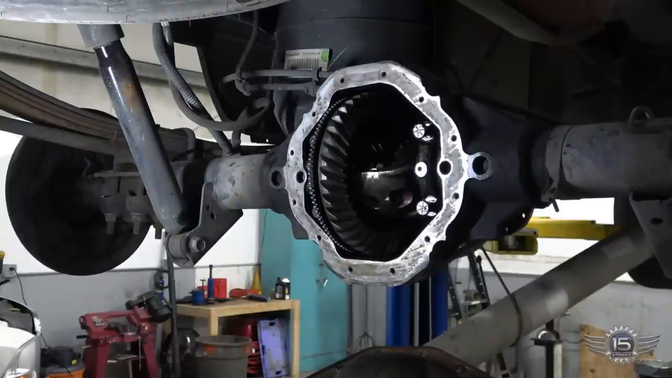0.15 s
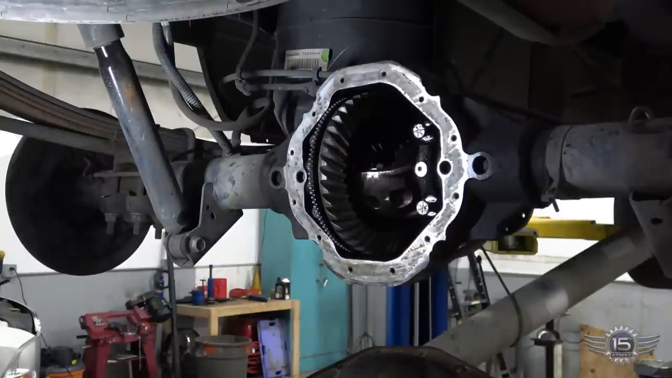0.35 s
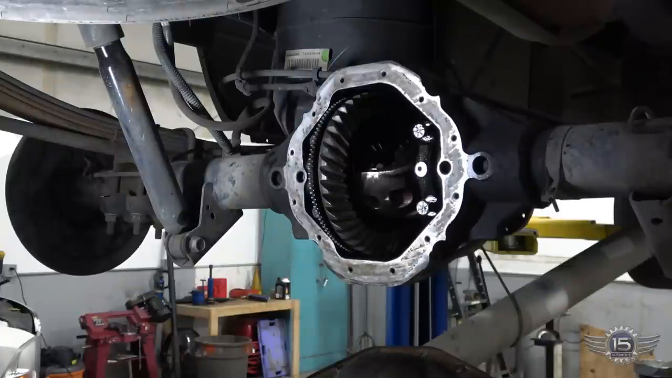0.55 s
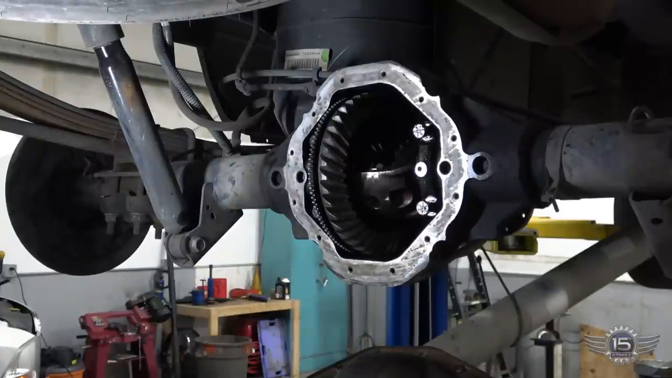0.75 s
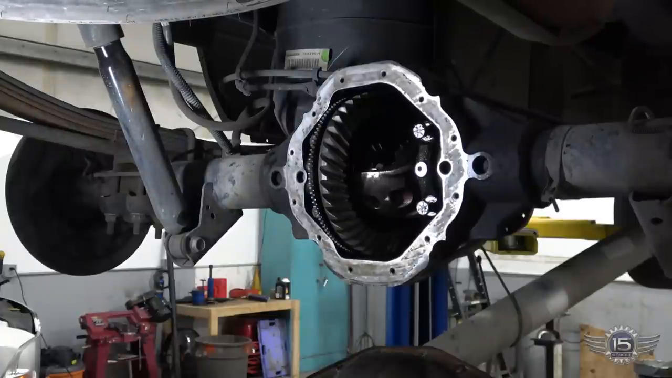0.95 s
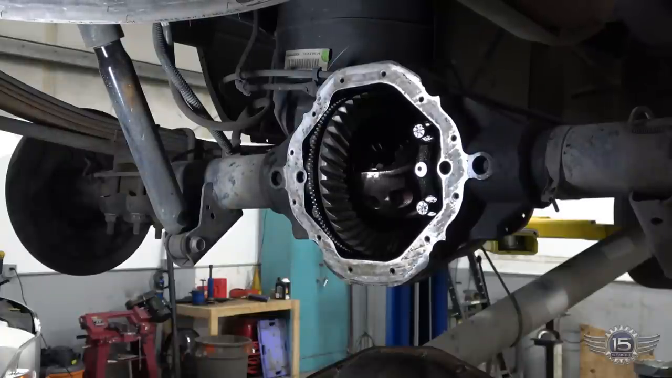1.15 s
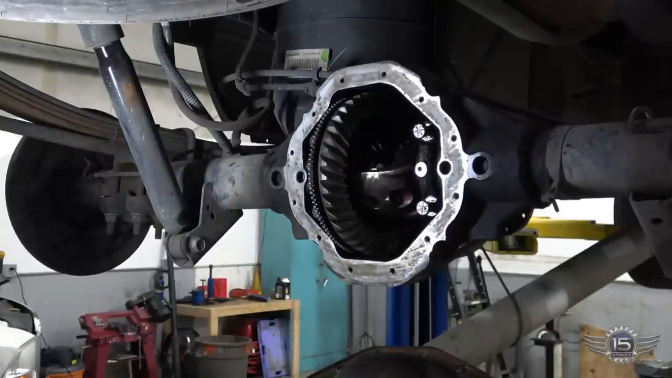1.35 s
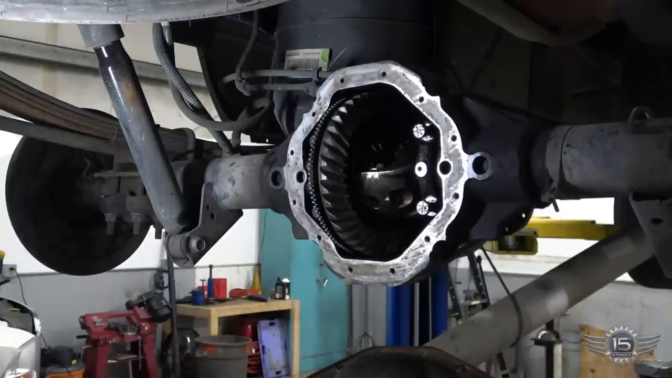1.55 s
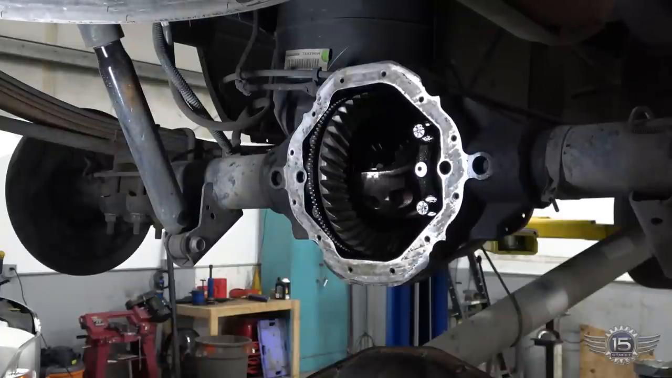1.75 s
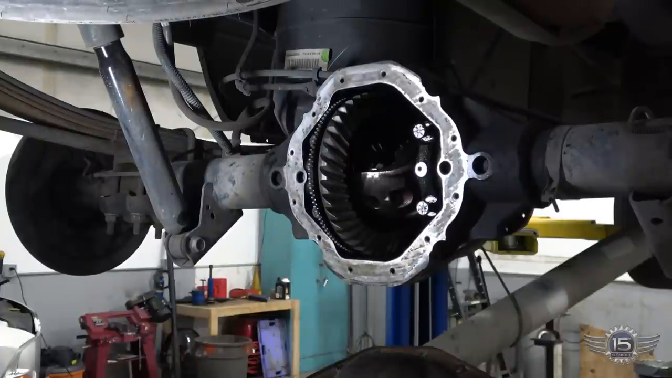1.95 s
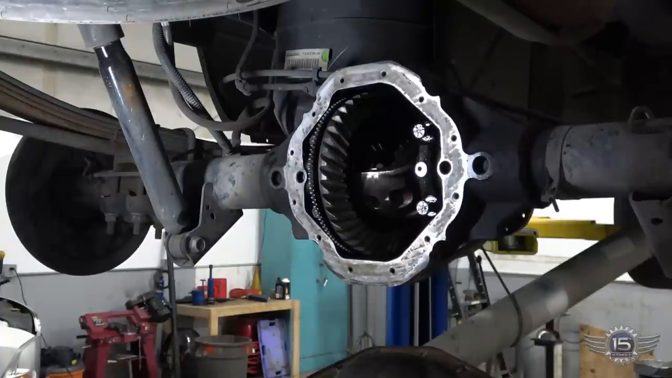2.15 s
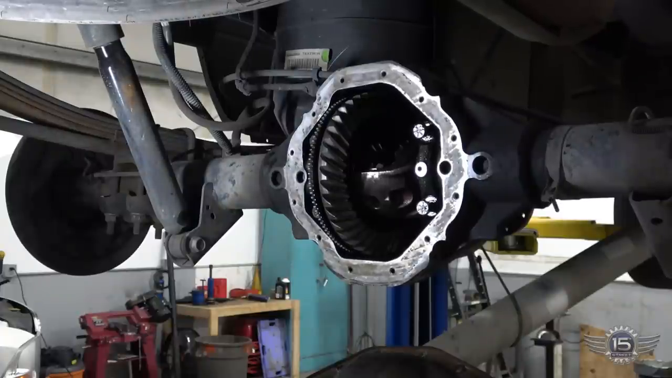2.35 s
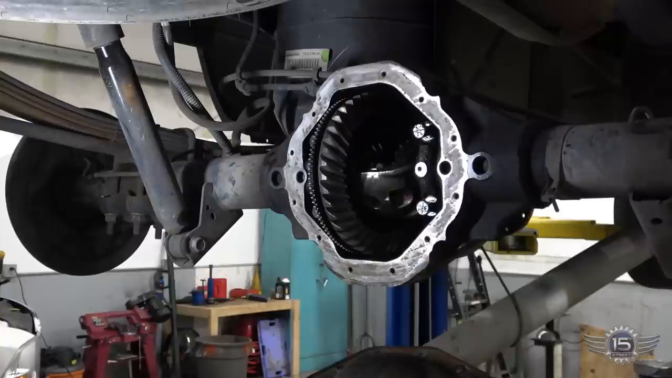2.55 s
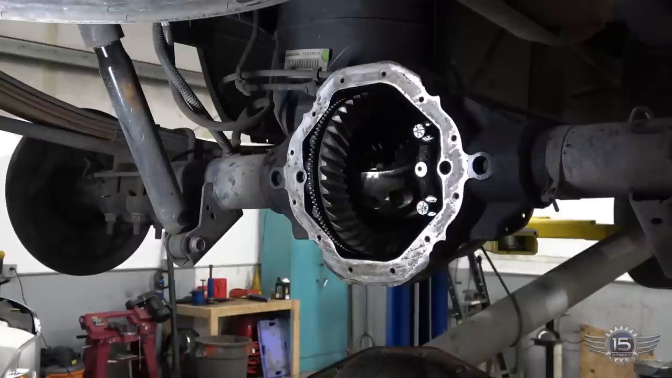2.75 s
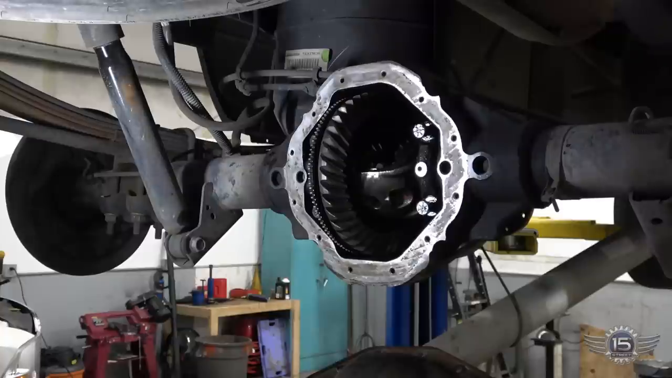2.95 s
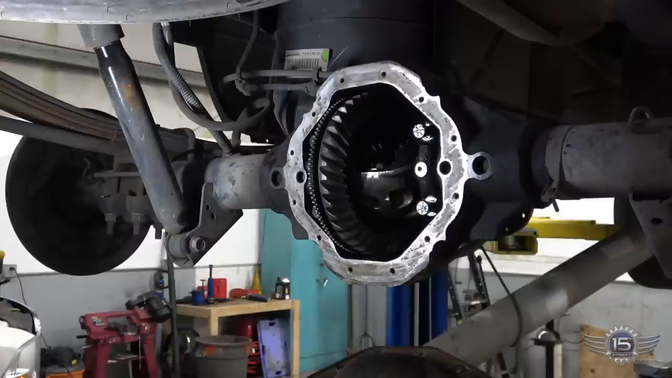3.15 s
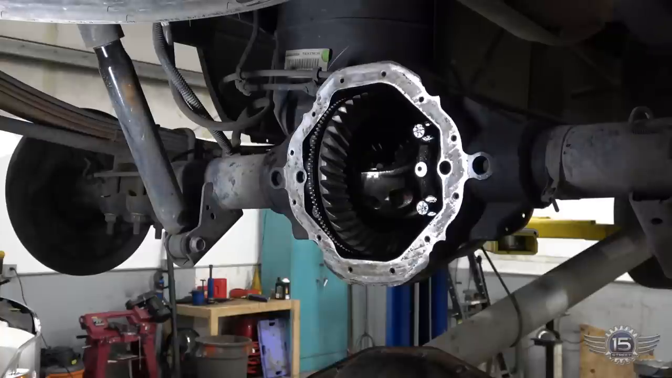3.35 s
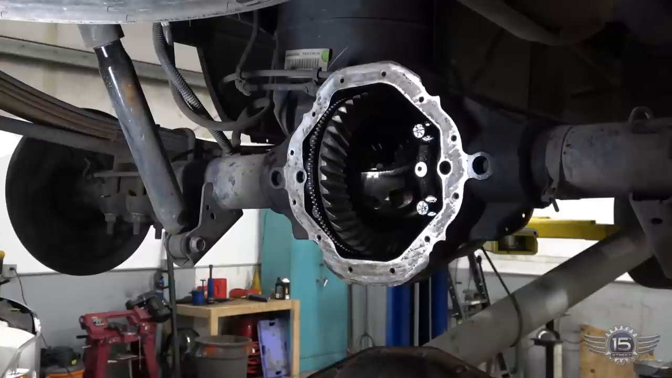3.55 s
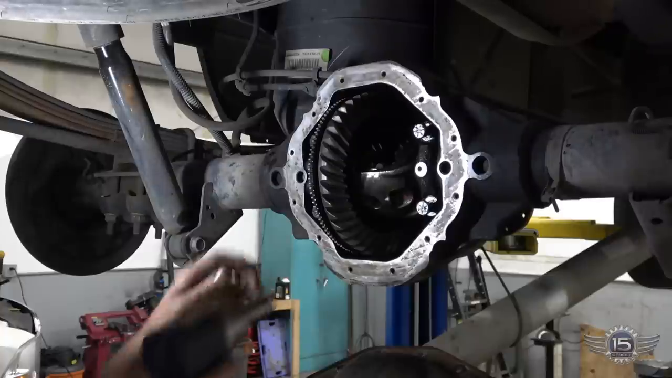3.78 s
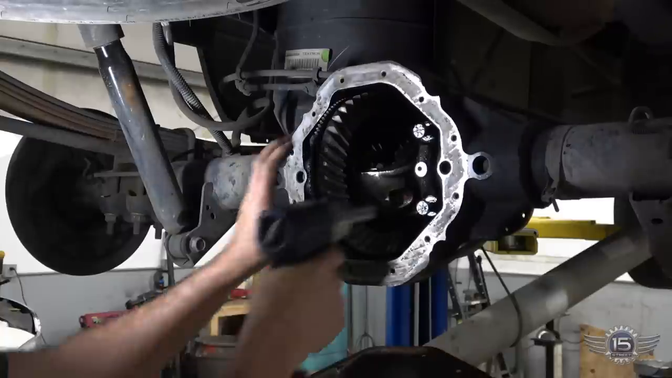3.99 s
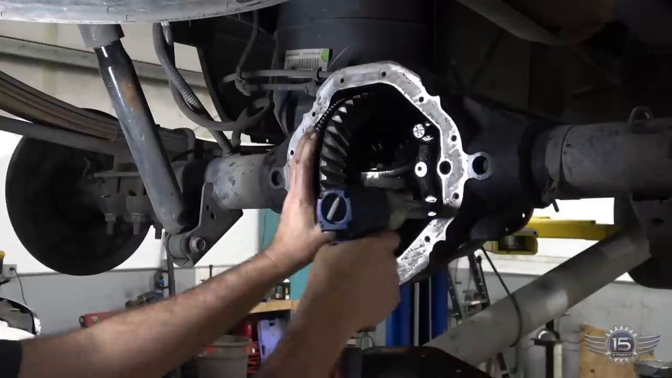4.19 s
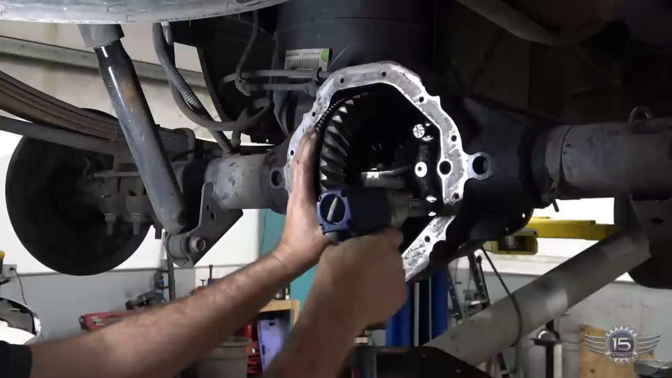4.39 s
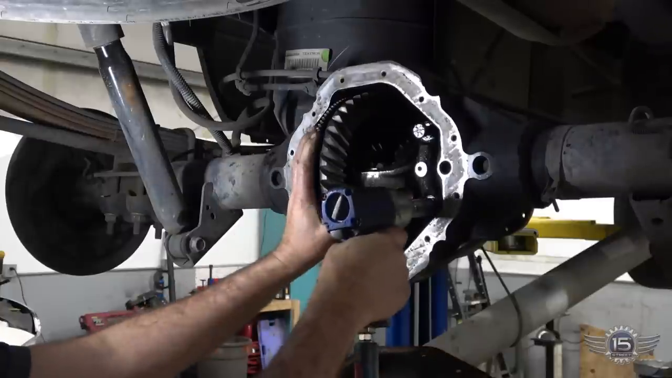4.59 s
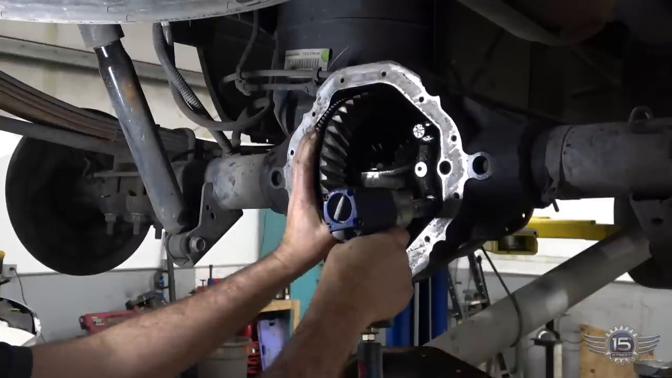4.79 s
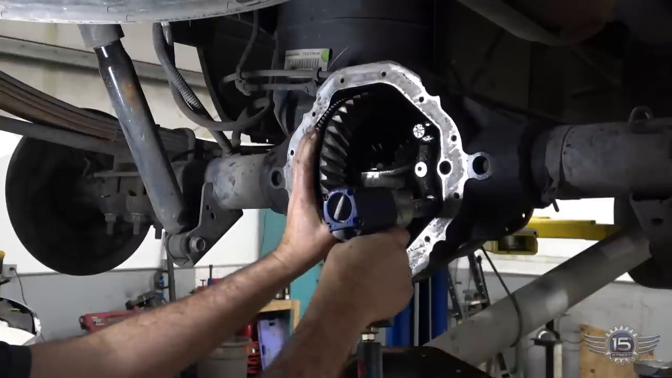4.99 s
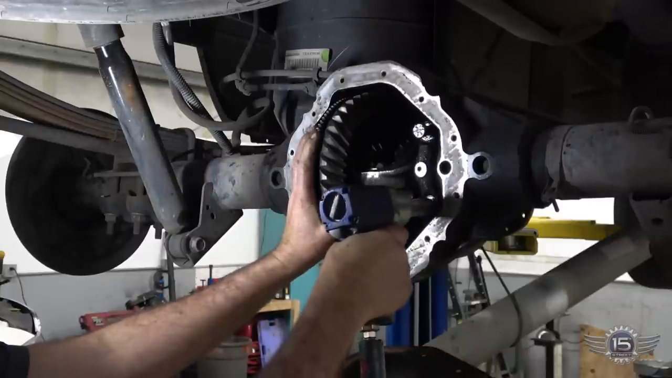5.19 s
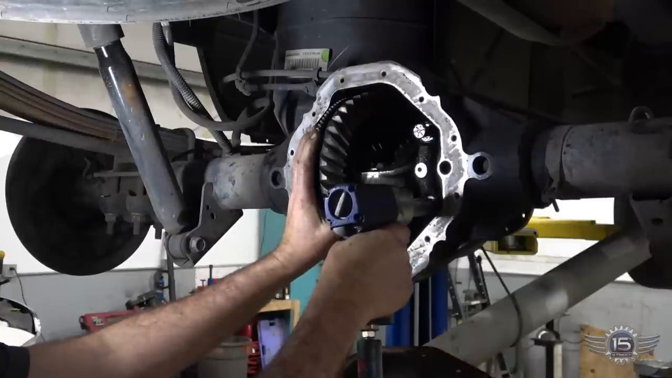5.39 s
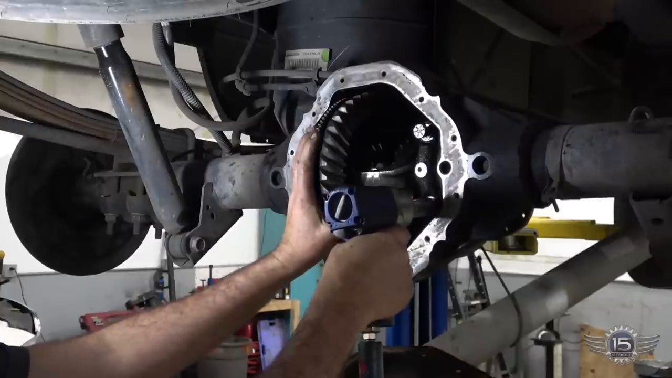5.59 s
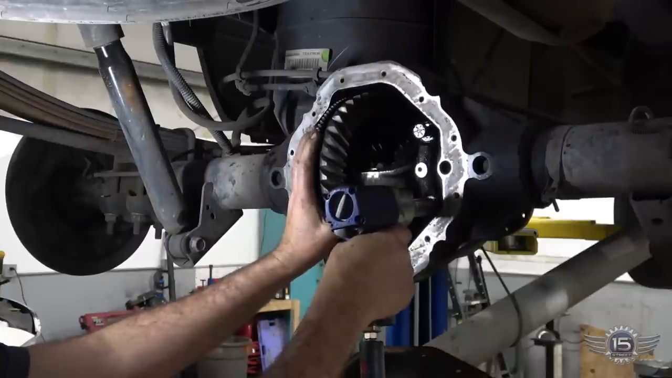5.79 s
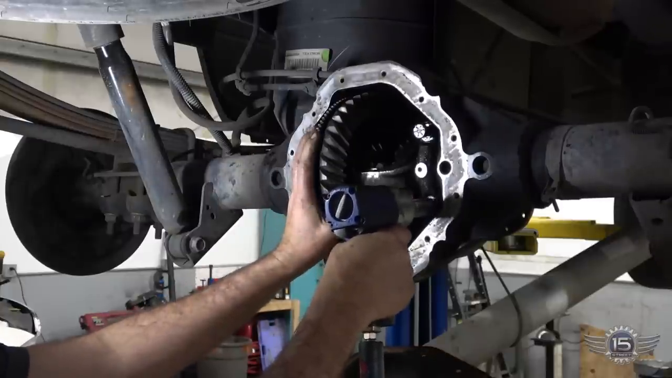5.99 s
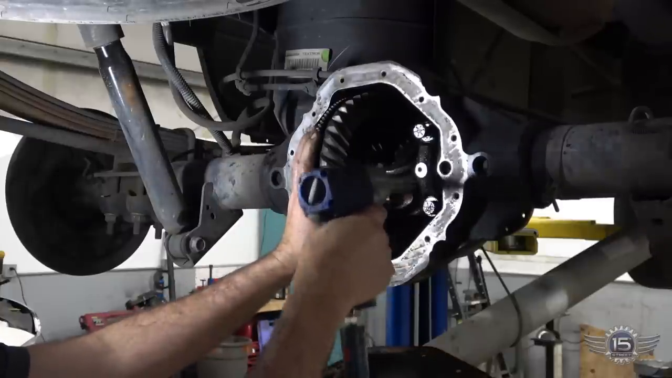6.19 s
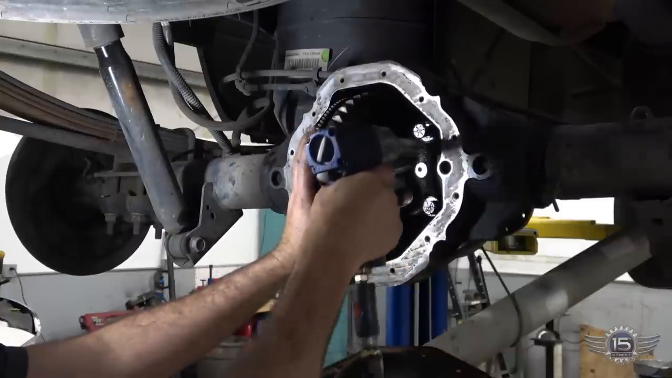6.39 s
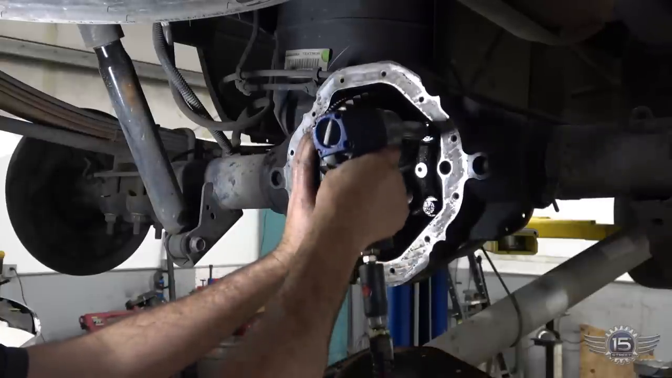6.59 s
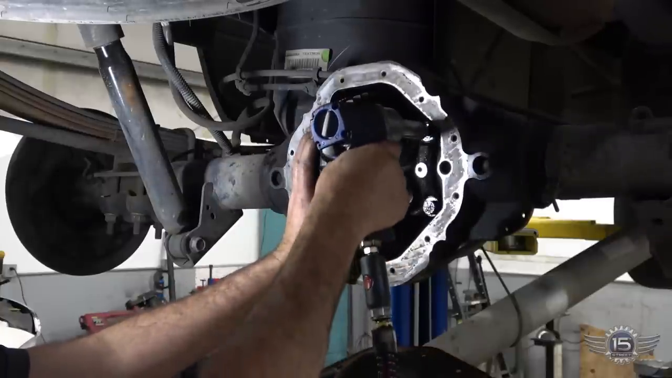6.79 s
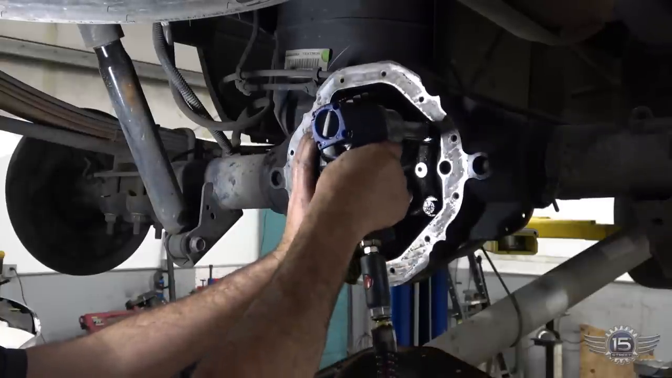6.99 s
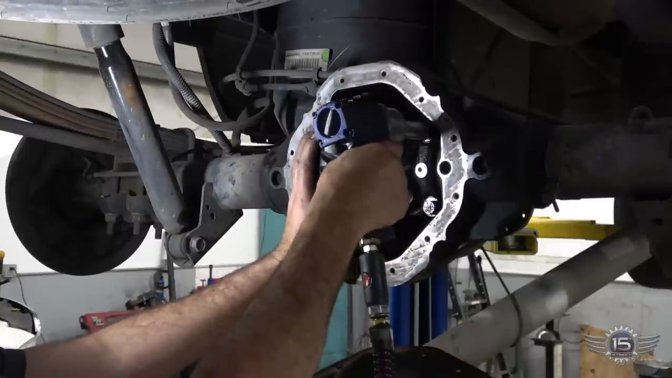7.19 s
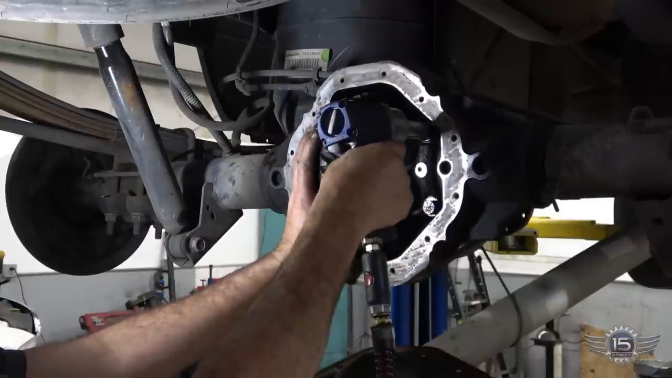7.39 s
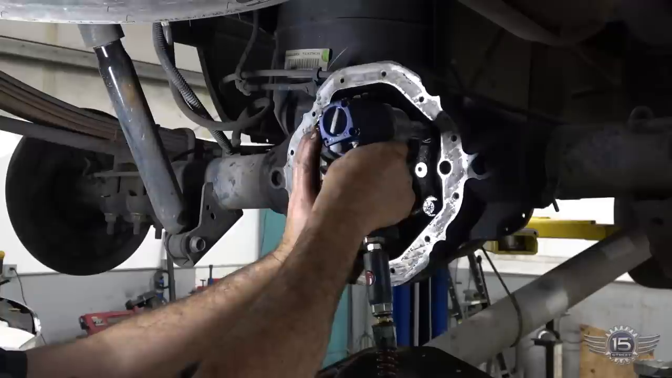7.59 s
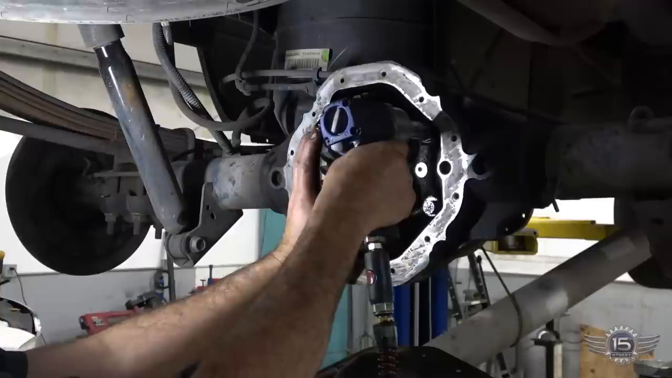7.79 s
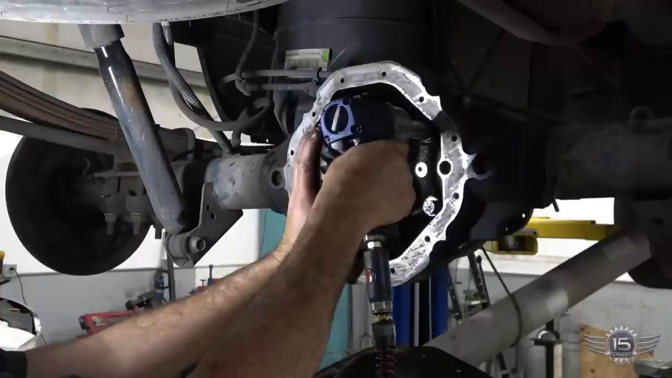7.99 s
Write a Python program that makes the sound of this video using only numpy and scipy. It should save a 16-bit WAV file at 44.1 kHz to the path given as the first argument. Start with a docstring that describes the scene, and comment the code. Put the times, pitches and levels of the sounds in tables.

```python
"""Air impact wrench in a garage

Small steel parts clink and knock on an axle housing; then an air impact wrench runs bolts in, in bursts.
The wrench is pulsed exhaust through damped resonances, with a hiss of filtered noise as its trigger opens.
Socket and heavy parts strike as dying modal noise; small steel parts ring as pairs of damped sines.
The hard-walled workshop answers with decaying noise echoes, over a low ventilation rumble."""
import sys
import numpy as np
from scipy import signal
from scipy.fft import rfft, irfft, next_fast_len
from scipy.io import wavfile
from scipy.ndimage import map_coordinates

SR = 44100
rng = np.random.default_rng(int(sys.argv[2]) if len(sys.argv) > 2 else 0)


def write(x):
    x = np.atleast_2d(x).T
    wavfile.write(sys.argv[1], SR, np.round(np.clip(x, -1, 1) * 32767).astype(np.int16))

N = 354563
TIME = np.arange(N) / SR

# runs of the air motor: (start t/s, air cut t/s, first rate/(puffs per s), top rate/(puffs per s), spin-up t/s,
# first puff level/dB, running level/dB, fade after the cut/(dB per s), steepness of the puffs at top speed 0-1)
MOTOR_RUNS = [(2.924, 3.031, 101.5, 392, 0.067, -3.5, 1, 103, 0.9),
              (5.171, 5.314, 92, 376, 0.126, -1, 0, 128, 1),
              (5.681, 5.733, 57, 117, 0.053, -1.5, -8, 600, 0.63),
              (7.005, 7.308, 35.5, 102, 0.13, -4.5, -9, 300, 0.86),
              (7.484, 7.568, 50, 78, 0.065, -3.5, -9.5, 114, 0.33),
              (7.685, 7.755, 42, 79, 0.051, -9, -7, 450, 0.05),
              (7.878, 8.04, 22, 77, 0.05, -4.5, -9, 302, 0.35)]


def amp(db):
    """A level in decibels becomes an amplitude ratio: 20 dB for each factor of ten."""
    return 10 ** (np.asarray(db) / 20)


def unit(x):
    """Normalisation of the mean power: the signal is scaled to rms 1."""
    return x / np.sqrt(np.mean(x ** 2) + 1e-20)


def along(points, hz):
    """Linear interpolation over log frequency of (f/Hz, value) points."""
    f, v = np.transpose(points)
    return np.interp(np.log(hz + 1), np.log(np.abs(f) + 1), v)


def lifts(peaks, hz):
    """Resonance peaks: each (f/Hz, width/Hz, lift/dB) adds a bell of dB to a spectrum."""
    return sum(db / (1 + (2 * (hz - centre) / width) ** 2) for centre, width, db in peaks)


def wobble(rate):
    """Band-limited fluctuation: a spline through random knots, rate of them a second."""
    knots = rng.standard_normal(int(N * rate / SR) + 4)
    return map_coordinates(knots, [TIME * rate])


def gate_db(start, stop, rise_db_per_s, fall_db_per_s):
    """Exponential growth and decay: the level in dB rises to 0 at start, holds, and falls from stop."""
    rise = -rise_db_per_s * np.maximum(start - TIME, 0)
    fall = -fall_db_per_s * np.maximum(TIME - stop, 0)
    return rise + fall


def colour(x, db_of_hz, size=4096):
    """Minimum-phase filtering: the folded cepstrum makes the dB at each frequency a causal response."""
    gain = np.maximum(amp(db_of_hz(np.fft.rfftfreq(size, 1 / SR))), 1e-6)
    cepstrum = irfft(np.log(gain))
    cepstrum[1:size // 2] *= 2
    cepstrum[size // 2 + 1:] = 0
    response = irfft(np.exp(rfft(cepstrum)))
    return signal.fftconvolve(x, response)[:len(x)]


def add(track, s, sound):
    """Superposition: a sound is summed into the track from time s."""
    start = int(np.clip(round(s * SR), 0, N - 1))
    track[start:start + len(sound)] += sound[:N - start]


def burst(t60, db_of_hz, attack_s=0.00044, size=16384):
    """A blow into many close modes: noise of rms 1 under a fast attack and an exponential decay."""
    t = TIME[:size]
    # the first half is dropped, so that the filter has settled
    ring = unit(colour(rng.standard_normal(2 * size), db_of_hz)[size:])
    decay = amp(-60 * t / max(t60, .004))
    return ring * decay * (1 - np.exp(-t / attack_s))


def ringing(modes, sign, size=8192):
    """Modal impulse response: damped cosines, each mode's weight multiplied by sign once more than the last."""
    t = TIME[:size]
    response = np.zeros(size)
    for k, (hz, width, db) in enumerate(modes):
        damping = np.exp(-np.pi * width * t)
        response += sign ** k * amp(db) * damping * np.cos(2 * np.pi * hz * t)
    return response


def motor(muffler_hz=1370, direct_db=-2, shield=0.28, housing_db=-19, swirl_db=-25, swirl_t60=0.035):
    """Source and resonator: puffs ring the exhaust passages, trail a swirl of air and shake the axle housing."""
    # resonances of the air passages: (f/Hz, width/Hz, level/dB)
    passages = [(314, 90, -14.5), (490, 98, -2), (816, 228, 3.5), (1182, 177, 2)]
    # modes of the open axle housing: (f/Hz, width/Hz, level/dB)
    housing_modes = [(261, 30, -3), (438.6, 32, 4), (538, 25, -2), (633, 34, 1.5), (690, 25, -4),
                     (940, 24, -6.5), (1000, 42, 4), (1130, 63, 4.5)]
    # how firmly the tool drives the housing: (t/s, relative level/dB)
    pressing = [(3.4, -13), (5.1, 1), (6.9, 2), (8.04, 3)]
    puffs = puff_train()
    press_db = np.interp(TIME, *np.transpose(pressing))

    muffler = signal.butter(6, muffler_hz, fs=SR, output="sos")
    pipe = signal.sosfilt(muffler, ringing(passages, 1))
    pipe = pipe / np.abs(pipe).max()

    # turbulence: noise whose energy follows the decaying energy of the puffs
    trail = np.abs(signal.fftconvolve(puffs ** 2, amp(-120 * TIME[:SR // 10] / swirl_t60))[:N])
    swirl = np.sqrt(trail) * rng.standard_normal(N) / np.linalg.norm(pipe)

    # held up to the axle, the exhaust is partly hidden by the hands
    direct = amp(direct_db - shield * press_db) * puffs
    exhaust = signal.fftconvolve(direct + amp(swirl_db) * swirl, pipe)[:N]

    # modes of alternating sign partly cancel at first, so the ring swells
    shaken = signal.fftconvolve(puffs * amp(housing_db + press_db), ringing(housing_modes, -1.01))[:N]
    shaken = colour(shaken, lambda hz: along([(1200, 2.5), (1600, -11.0), (3000, -24)], hz))
    return colour(exhaust + shaken, lambda hz: along([(30, -27), (140, -4), (330, 0)], hz))


def puff_train(scatter_db=8, edge_hz=450, first_front=0.9, front_power=1.1, free_rate=380):
    """Pulsed flow: each vane lets out one puff; slow puffs are rounder and less even."""
    choke_rate = 178  # puffs per s above which the air supply runs short and each puff shrinks
    coast_octaves_per_s, coast_db = 0.5, 29.5  # slowing after the cut; the run stops after this fade
    # unevenness: labouring, spinning freely, added per second of coasting
    uneven_slow, uneven_fast, uneven_per_coast_s = 0.23, 0.06, 2.56
    speed_waver, wavers_per_s = 0.018, 30  # the motor hunts around its speed: relative depth, knots per s
    steep, soft, hunting = np.zeros(N), np.zeros(N), wobble(wavers_per_s)
    for start, cut, first_rate, top_rate, spin_s, first_db, run_db, fade, top_front in MOTOR_RUNS:
        # the motor speeds up steadily, holds, and coasts after the cut
        t = np.arange(start, cut + coast_db / fade, 1 / SR)
        speed = np.interp(t, [start, start + spin_s], [first_rate, top_rate])
        speed = speed * 2 ** (-coast_octaves_per_s * np.maximum(t - cut, 0))

        # one puff falls at each whole number of the running puff count
        count = np.cumsum(speed * (1 + speed_waver * np.interp(t, TIME, hunting))) / SR
        times = np.interp(np.arange(count[-1]), count, t)
        rate, coast = np.interp(times, t, speed), np.maximum(times - cut, 0)

        uneven = np.interp(rate, [0, free_rate], [uneven_slow, uneven_fast]) + uneven_per_coast_s * coast
        late, strong = rng.standard_normal((len(times), 2)).T * uneven
        db = run_db - fade * coast + scatter_db * strong
        front = top_front * (rate / top_rate) ** front_power
        # the first kick has its own level and front
        late[0], db[0], front[0] = 0, first_db, first_front

        at = np.minimum((times + late / rate / 4) * SR, N).astype(int)
        strength = amp(db) * np.minimum(1, choke_rate / rate)
        share = np.clip(front, 0, 1)
        steep += np.bincount(at, strength * share, N)[:N]
        soft += np.bincount(at, strength * (1 - share), N)[:N]
    rounding = signal.butter(1, edge_hz, fs=SR, output="sos")
    return steep + signal.sosfilt(rounding, soft)


def jolts():
    """Reaction to starting torque: the tool jolts with a low thump as its motor starts."""
    thump_db, thump_t60, lead_s = -20, 0.068, 0.005  # relative to the first puff and just ahead of it
    # spectrum of the thump: (f/Hz, density level/dB)
    thump = [(45, -29.5), (120, 1), (260, -2.5), (600, -16), (2000, -54)]
    out = np.zeros(N)
    for start, _, _, _, _, first_db, *_ in MOTOR_RUNS:
        blow = burst(thump_t60, lambda hz: along(thump, hz), attack_s=0.0012)
        add(out, start - lead_s, amp(first_db + thump_db) * blow)
    return out


def hiss(gain_db=0.0, flutter_db=1, open_db=-25, blur=0.38):
    """Jet noise: a thin stream whistles in the port resonances, a full stream blurs them."""
    # broadband spectrum of the jet: (f/Hz, density level/dB)
    jet = [(40, -56), (100, -14), (250, -2), (800, -13), (1600, -8.5), (2300, -8.5), (3100, -5),
           (5000, -5.5), (7000, 1), (9500, -1.5), (11000, -7.5), (13000, -13.5), (16000, -20)]
    # resonances of the ports: (f/Hz, width/Hz, lift in a thin stream/dB)
    ports = [(1082, 175, 20.5), (1964, 93, 11.5), (2647, 255, 17), (3556, 180, 15.5), (4285, 270, 10),
             (6020, 620, 7.5), (9740, 890, 11)]
    flow = air_flow()
    thin = unit(colour(rng.standard_normal(N), lambda hz: along(jet, hz) + lifts(ports, hz)))
    full = unit(colour(rng.standard_normal(N), lambda hz: along(jet, hz) + blur * lifts(ports, hz)))
    share = flow ** 2 / (flow ** 2 + amp(open_db) ** 2)
    stream = np.sqrt(1 - share) * thin + np.sqrt(share) * full
    return stream * flow * amp(gain_db + flutter_db * wobble(150))


def air_flow():
    """Valve throttling: it leaks, swells to a full squeeze, settles as the motor takes the air, and shuts."""
    # trigger pulls: (valve cracks open t/s, full squeeze t/s, valve shuts t/s, swell t/s, settling t/s,
    # leak level/dB, squeeze level/dB, settled level/dB)
    pulls = [(2.028, 2.04, 2.05, 0.005, 0.025, -46, -46, -52),
             (2.845, 3.074, 3.19, 0.25, 0.18, -28.5, -17.5, -33),
             (4.702, 5.158, 5.605, 0.27, 0.21, -36.5, -20, -38),
             (5.60, 5.661, 6.056, 0.072, 0.28, -39, -22, -34),
             (6.833, 7.018, 7.78, 0.19, 0.06, -42, -20, -25)]
    valve_db_per_s = 550  # how fast the hiss comes and goes at the valve
    flow = np.zeros(N)
    for opens, squeeze, shuts, swell_s, settle_s, leak_db, squeeze_db, settled_db in pulls:
        knots = [squeeze - swell_s, squeeze, squeeze + settle_s]
        db = np.interp(TIME, knots, [leak_db, squeeze_db, settled_db])
        valve_db = np.maximum(gate_db(opens, shuts, valve_db_per_s, valve_db_per_s), -100)
        flow = np.maximum(flow, amp(db + valve_db))
    return flow


def clacks(gain_db=-9, top_db=3):
    """Impact excitation: the socket strikes the bolt head and rings briefly, high up."""
    # hard clacks: (t/s, relative level/dB, relative top-end level/dB)
    strikes = [(2.9515, -4.5, -23), (3.0527, -2.5, -17.5), (3.079, -16, -38), (3.158, -9, -18),
               (3.2282, -5, -20), (3.3709, 1.5, -19), (5.1898, -0.5, -14), (5.2223, 2, -12),
               (5.2364, 1, -28.5), (5.2612, -2.5, -19), (5.2963, 2.5, -18), (5.3357, -3, -20),
               (5.3737, -1.5, -11), (5.687, -3.5, -31), (5.7446, 3.5, -23), (6.985, -8, -20),
               (7.0154, -2.5, -15), (7.0249, -5, -10), (7.0825, -1, -16.5), (7.102, -7, -9),
               (7.1528, 3, -25), (7.176, -12, -15), (7.202, -10, -17), (7.2863, -6.5, -40),
               (7.4928, -6.5, -17), (7.5735, 3.5, -14.5), (7.7667, 2, -23), (7.9632, 3, -23.5),
               (7.9754, -1, -11)]
    # high resonances of the socket: (f/Hz, width/Hz, lift/dB)
    socket_ring = [(9800, 660, 0), (12130, 530, 6.5), (13250, 380, 15.5), (14200, 400, 12)]
    clack_t60 = 0.04  # s
    out = np.zeros(N)
    for s, db, bright_db in strikes:
        edge_db = bright_db + top_db
        shape = [(60, -52.5), (300, -18.0), (1500, -16.5), (3200, -11.0), (9000, -9.5),
                 (12000, edge_db - 3.5), (15500, edge_db - 20.5)]
        blow = burst(clack_t60, lambda hz: along(shape, hz) + lifts(socket_ring, hz))
        add(out, s, amp(db + gain_db) * blow)
    return out


def chatter(rate=700, spread_db=4, gain_db=-3, t60=0.043):
    """Random impact process: the socket rattles with many small contacts a second, of uneven strength."""
    # spectrum of the rattle: (f/Hz, density level/dB)
    socket = [(180, -40), (300, -8.5), (502, -7.5), (624, -6), (1170, -2.5), (1660, -4.5), (2520, -4.5),
              (4750, -7.5), (6520, -11), (9880, -13), (16000, -39.5)]
    contacts = (rng.random(N) < rate / SR) * amp(spread_db * rng.standard_normal(N))
    energy = np.abs(signal.fftconvolve(contacts ** 2, amp(-120 * TIME[:SR // 10] / t60))[:N])
    rattle = colour(np.sqrt(energy) * rng.standard_normal(N), lambda hz: along(socket, hz))
    return amp(gain_db) * unit(rattle) * rattling()


def rattling():
    """Exponential envelope: each bout of rattling flares up, then fades, or grows if its fade is negative."""
    # bouts of the loose socket: (t/s, relative level/dB, fade/(dB per s))
    bouts = [(2.96, -22, 49), (3.055, -13, 65), (3.229, -7, 113), (5.164, -12, 110), (5.329, -15, 190),
             (5.736, -14.5, 238), (6.995, -21, 134), (7.62, -28.5, -6)]
    rise_s = 0.0085
    level = np.zeros(N)
    for s, db, fade in bouts:
        level += np.clip((TIME - s) / rise_s, 0, 1) * amp(db - fade * np.maximum(TIME - s, 0))
    return level


def squeals(waver=0.006):
    """Friction-driven vibration: steel slipping on steel sings in two thin, unsteady tones."""
    # slips of the socket on a bolt head: (t/s, length t/s, relative level/dB)
    slips = [(5.373, 0.006, -27), (6.978, 0.008, -36), (7.0, 0.032, -24)]
    # tones: (f/Hz, relative level/dB)
    tones = [(8990, -1), (12130, 0.5)]
    rise_db_per_s, fall_db_per_s = 3000, 900
    slip = sum(amp(db + gate_db(s, s + length, rise_db_per_s, fall_db_per_s)) for s, length, db in slips)
    song = np.zeros(N)
    for hz, db in tones:
        pitch = hz * (1 + waver * wobble(400))
        song += amp(db) * np.sin(2 * np.pi * np.cumsum(pitch) / SR)
    return slip * song


def knocks(gain_db=-9, body_db=8, top_db=12):
    """Modal impact on the heavy housing: heavy parts bring more body, sharp edges more top."""
    # parts and tool set against the housing: (t/s, relative level/dB, relative body level/dB,
    # relative top-end level/dB, t60/s)
    blows = [(0.0125, -6.5, 4, -13, 0.13), (0.429, -33, -13, -4, 0.12), (0.6337, -41, -6, -25, 0.085),
             (0.856, -44, -13, -23, 0.08), (0.9302, -34.5, 1, -19, 0.089), (1.0982, -34.5, 2, -26, 0.073),
             (1.2287, -21, -4, 3, 0.1), (1.3637, -20.5, -20, -4, 0.032), (1.718, -25, -7.5, -8, 0.079),
             (2.119, -15, -14, 7, 0.14), (2.2712, -19.5, -4, -30, 0.078), (2.3392, -23, -11, -30, 0.11),
             (2.6539, -20, -21, -12, 0.26), (3.8875, -13, -19, -9, 0.089),
             (3.8945, -12, -29.5, -19.5, 0.15), (3.9135, -11, -16.5, -14, 0.072),
             (4.248, -11, -18, -17, 0.093), (4.2682, -11.5, -15, -60, 0.078), (4.4226, -29.5, 3, -21, 0.14),
             (4.461, -28, 8, -13, 0.1), (6.5314, -3, -32, -9.5, 0.1), (6.5401, -12, -3, -18, 0.084)]
    # spectrum of a knock: (f/Hz, density level/dB)
    steel = [(100, -21), (300, -10.5), (520, 4.5), (1000, 1.5), (2100, -4), (3200, -2.5), (5000, -3.5),
             (7200, -10.5), (9500, -12.5), (12000, -22.5), (15000, -38)]
    # resonances of the steel: (f/Hz, width/Hz, lift/dB)
    steel_ring = [(1210, 110, 4.5), (1610, 130, 8.5), (4350, 67, -0.5), (4230, 180, 2), (8500, 400, 4.5),
                  (9400, 370, 2)]
    out = np.zeros(N)
    for s, db, heavy_db, bright_db, t60 in blows:
        low, high = min(heavy_db + body_db, 12), min(bright_db + top_db, 5)
        tilt = [(100, 0), (900, low), (3000, 0), (6500, 0), (12000, high)]

        def spectrum(hz):
            return along(steel, hz) + lifts(steel_ring, hz) + along(tilt, hz)

        add(out, s, amp(db + gain_db) * burst(t60, spectrum, attack_s=0.0009))
    return out


def band_bursts(gain_db=-5.0, swell=0.013):
    """Band-limited excitation: each short sound fills one band; those that ring longer swell more slowly."""
    # light contacts, booms of the housing, and chirps of the air ports as the valve opens:
    # (t/s, relative level/dB, f/Hz, half width/octaves, t60/s)
    short_sounds = [(.014, -28, 900, 0.36, 0.086), (0.018, -15, 2580, 0.43, 0.11),
                    (.02, -19.5, 480, 0.32, 0.11), (1.609, -25, 6540, 0.25, 0.063),
                    (1.648, -35, 1900, 0.85, 0.18), (2.032, -31.5, 1110, 0.34, 0.27),
                    (2.492, -29.5, 890, 0.51, 0.41), (2.604, -25, 5500, .2, 0.019),
                    (2.621, -34, 3000, 0.56, 0.13), (2.655, -33, 100, 0.9, 0.35),
                    (2.827, -24.5, 1220, .25, 0.24), (2.848, -10.5, 600, 0.84, 0.037),
                    (2.904, -17, 450, 0.88, 0.052), (4.281, -26, 182, 1.7, 0.43),
                    (4.463, -18, 3920, 0.93, 0.024), (4.727, -15, 1030, 0.17, 0.093),
                    (4.735, -18, 497, 0.57, 0.047), (4.799, -18, 417, 0.5, 0.23),
                    (5.737, -10.5, 600, 0.96, 0.035), (6.551, -23, 188, 1.63, 0.67),
                    (6.587, -23, 1050, 0.76, 0.061), (6.853, -25, 1090, 0.26, 0.18),
                    (7.59, -15, 750, 0.27, 0.09)]
    out = np.zeros(N)
    for s, db, centre, width, t60 in short_sounds:
        def spectrum(hz):
            band = np.maximum(-6 * (np.log2((hz + 1) / centre) / width) ** 2, -70)
            return band + along([(35, -27), (85, -2.5)], hz)

        add(out, s, amp(db + gain_db) * burst(t60, spectrum, attack_s=swell * t60))
    return out


def slide(gain_db=-3, rough_db=3):
    """Friction noise: parts sliding in the hand rub unevenly, steel on steel."""
    # strokes: (t/s, length t/s, relative level/dB)
    rubs = [(0.01, 0.056, -32), (1.855, 0.064, -41.5), (2.135, 0.016, -33.5), (2.19, 0.24, -42.5)]
    rise_db_per_s, fall_db_per_s = 500, 130
    shape = [(500, -1.0), (3000, -2.5), (8500, -1.5), (12000, -21.0), (16000, -31)]
    rub = colour(rng.standard_normal(N), lambda hz: along(shape, hz))
    strokes = sum(amp(db + gate_db(s, s + length, rise_db_per_s, fall_db_per_s)) for s, length, db in rubs)
    return amp(gain_db) * strokes * unit(rub * amp(rough_db * wobble(90)))


def clinks(gain_db=-2):
    """Free vibration: small steel parts ring with two pairs of exponentially damped sines."""
    # small steel parts ringing: bolts touching, the socket at 4.249 and 6.532, the trigger's release at 6.075:
    # (t/s, first pair relative level/dB, second pair relative level/dB)
    rings = [(.430, -66, -32), (.745, -80, -58), (1.234, -24.5, -70), (1.29, -57, -35), (1.366, -29, -56),
             (1.655, -37.5, -52), (1.719, -65, -30.5), (4.249, -68, -41), (6.075, -80, -52),
             (6.532, -60, -48)]
    # the two pairs of modes, each mode: (f/Hz, relative level/dB, t60/s)
    mode_pairs = [
        [(10350, 1, 0.21), (10900, 3, 0.2)],
        [(12060, -3, 0.17), (13570, -6.5, 0.41)],
    ]
    out, t = np.zeros(N), TIME[:SR]
    attack = 1 - np.exp(-t / 0.00031)
    for s, *strengths in rings:
        for db, modes in zip(strengths, mode_pairs):
            for hz, mode_db, t60 in modes:
                # each mode is struck a little harder or softer at random
                decay = amp(db + gain_db + mode_db + rng.standard_normal() - 60 * t / t60)
                add(out, s, decay * np.sin(2 * np.pi * hz * t) * attack)
    return out


def whistle(waver=0.00781):
    """Frequency modulation: a thin tone, silent at this negative length; a positive one makes it swell and glide."""
    # (t/s, length t/s, starting f/Hz, relative level/dB)
    tone = (6.3, -0.4, 8800, -50)
    octaves_per_s = 2.3  # downward glide
    s, length, hz, db = tone
    age = np.clip(TIME - s, 0, length)
    pitch = hz * 2 ** (-octaves_per_s * age) * (1 + waver * wobble(60))
    swell = np.sqrt(np.abs(np.sin(np.pi * age / length)))
    return amp(db) * swell * np.sin(2 * np.pi * np.cumsum(pitch) / SR)


def garage(x, build_s=0.0017):
    """Reverberation: echoes build up behind the direct sound, and each frequency dies at its own speed."""
    # reverberation time: (f/Hz, t60/s)
    decay_times = [(100, 0.9), (400, 0.41), (1200, 0.58), (4000, 0.99), (8000, 0.8), (14000, 0.33)]
    # strength of the walls' answer: (f/Hz, relative level/dB)
    walls = [(100, 19), (400, 1), (1200, 6.5), (4000, 6), (9000, 2.5), (14000, -0.5)]
    hz, t, z = signal.stft(rng.standard_normal(SR), SR, nperseg=256)
    z = z * amp(along(walls, hz)[:, None] - 60 * t / along(decay_times, hz)[:, None])
    tail = signal.istft(z, SR, nperseg=256)[1][:SR] * (1 - np.exp(-TIME[:SR] / build_s))
    return signal.fftconvolve(x, tail / np.linalg.norm(tail))[:N]


def ventilation(db=-46, drift_db=1.1):
    """Broadband flow noise: the low rumble of the workshop, drifting slightly in level."""
    # spectrum of the rumble: (f/Hz, density level/dB)
    vent = [(13, -40), (25, -26), (50, -13), (80, -1.5), (128, -7), (229, -7.5), (328, -14.5), (569, -14),
            (750, -17), (837, -14.5), (1230, -21), (1490, -23), (2140, -29), (2320, -28), (11200, -43.5),
            (16000, -46.5)]
    rumble = unit(colour(rng.standard_normal(N), lambda hz: along(vent, hz), size=16384))
    return rumble * amp(db + drift_db * wobble(6.6))


def scene():
    """Superposition of direct sound, reverberation and rumble, the same in both channels."""
    puffs, air = motor() + jolts(), hiss() + whistle()
    socket = chatter() + clacks() + squeals()
    contacts = knocks() + band_bursts() + slide()
    rings = clinks()
    # each source drives the room at its own level
    sent = amp(-8.5) * puffs + amp(-7.5) * air + amp(-7.0) * socket + amp(-8.5) * contacts + amp(-1.0) * rings
    mono = puffs + air + socket + contacts + rings + garage(sent) + ventilation()
    return np.array([mono, mono])


def record(dry):
    """Saturation and band limiting: the loudest peaks are rounded off, then the top is cut."""
    top_hz = 15900
    rounded = dry / (1 + np.abs(dry) ** 6) ** (1 / 6)
    size = next_fast_len(N + SR // 2)
    kept = np.fft.rfftfreq(size, 1 / SR) < top_hz
    return irfft(rfft(rounded, size) * kept, size)[:, :N]


dry = scene()
out = record(dry)
write(out)
```